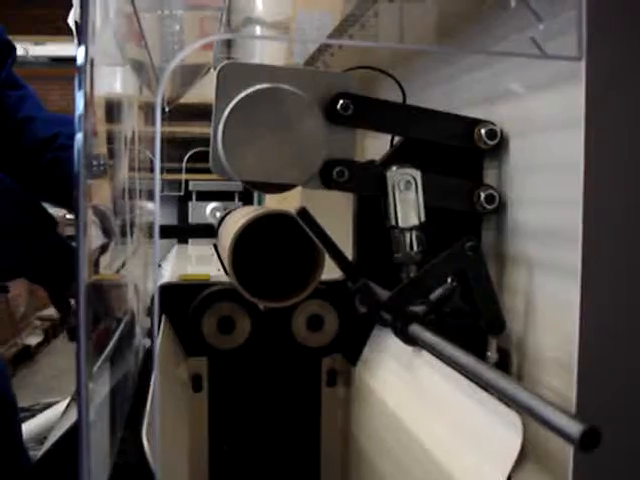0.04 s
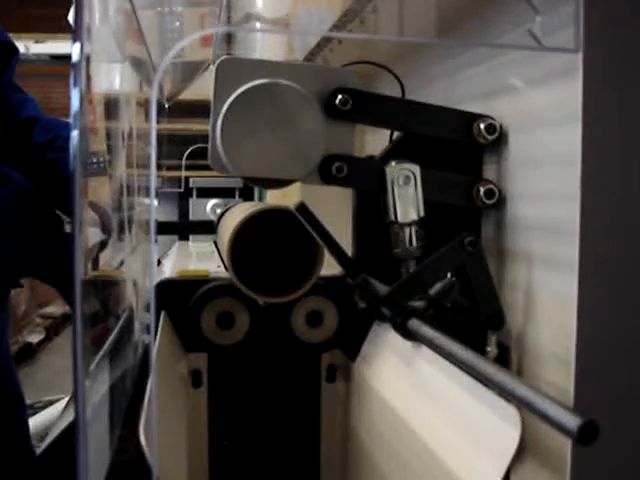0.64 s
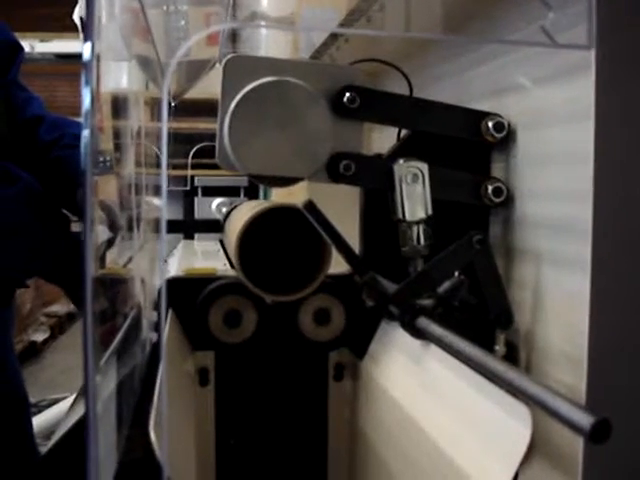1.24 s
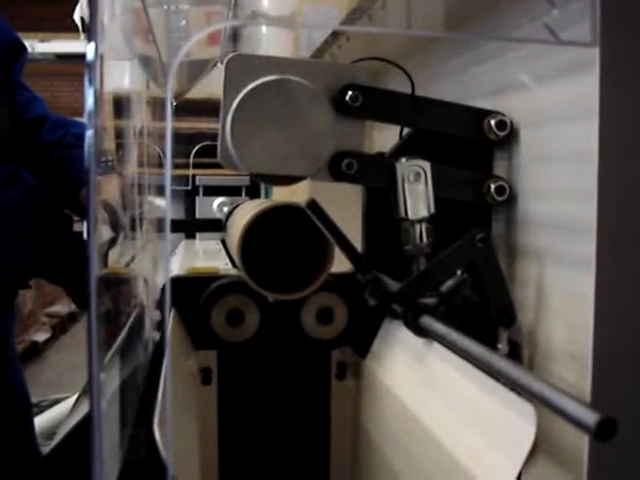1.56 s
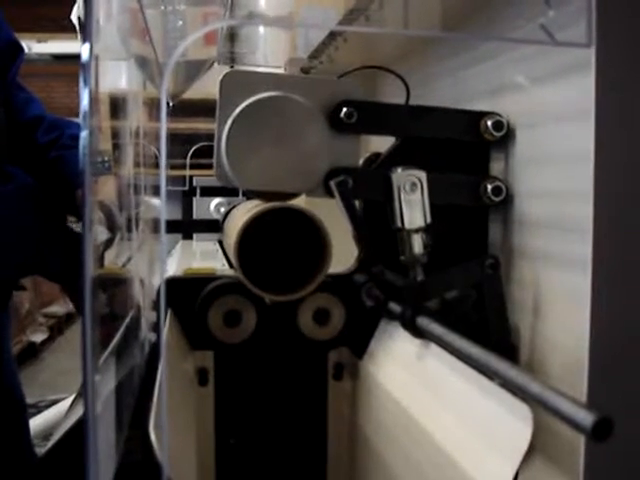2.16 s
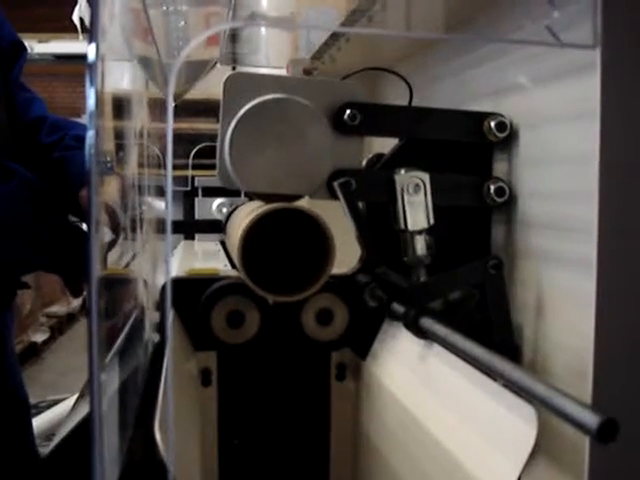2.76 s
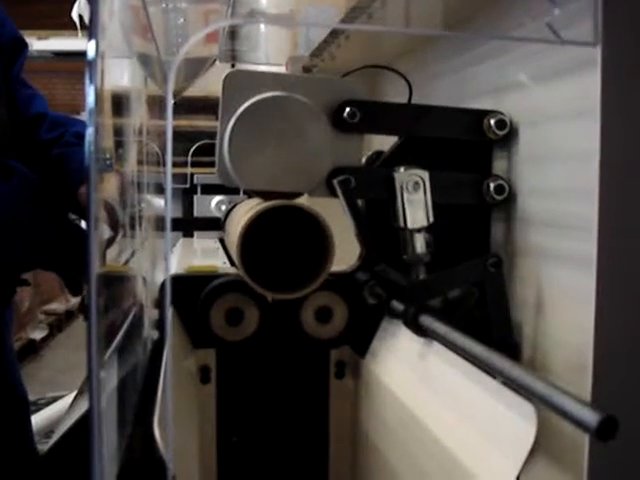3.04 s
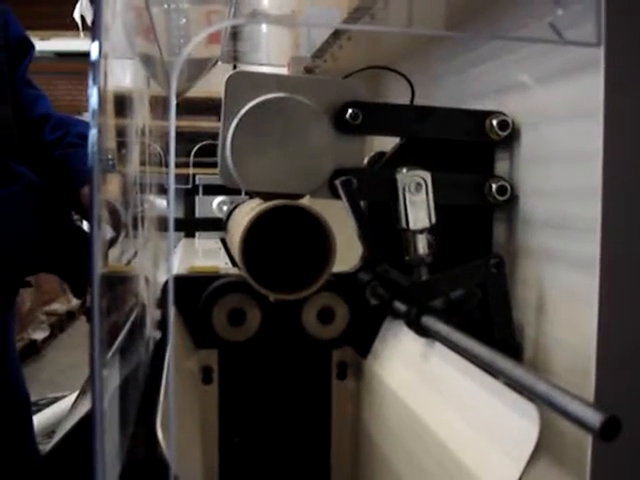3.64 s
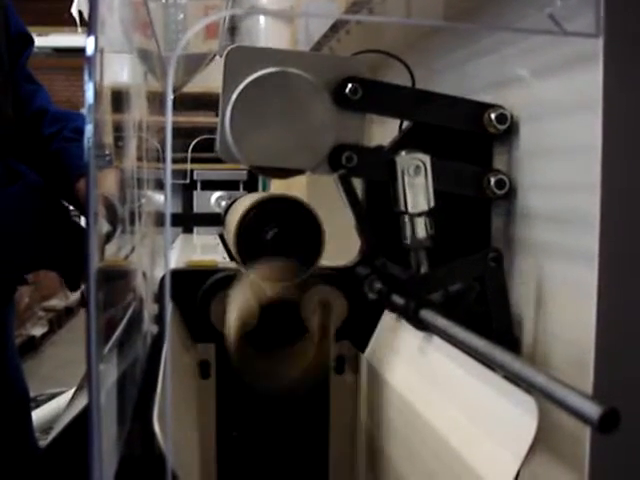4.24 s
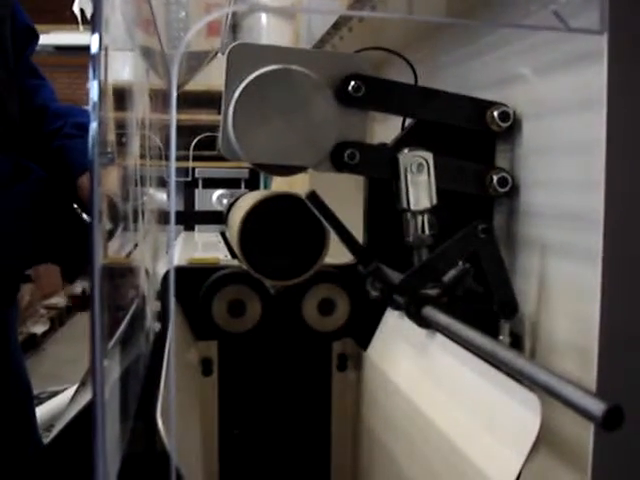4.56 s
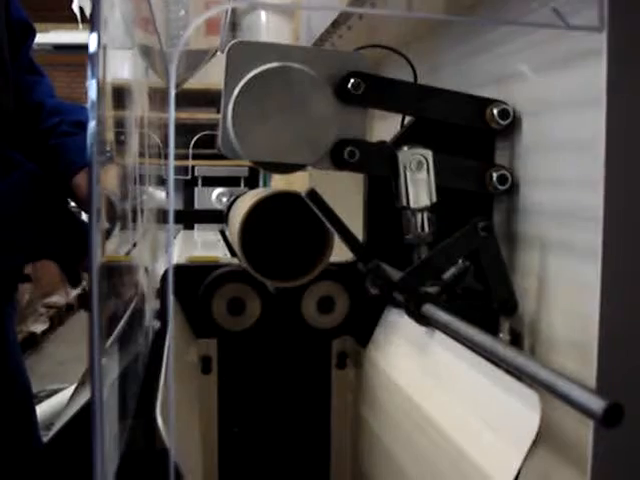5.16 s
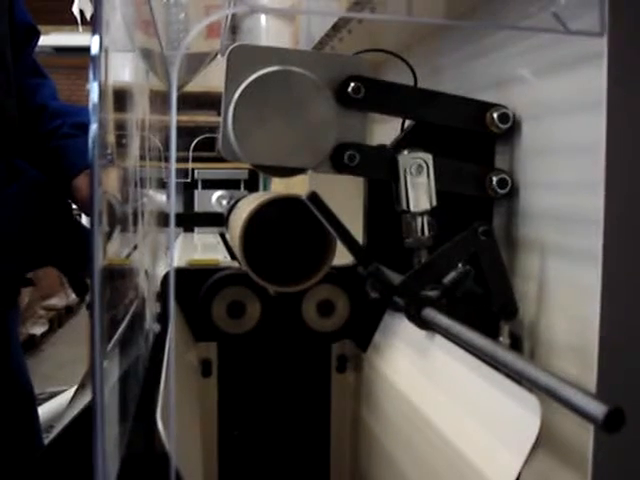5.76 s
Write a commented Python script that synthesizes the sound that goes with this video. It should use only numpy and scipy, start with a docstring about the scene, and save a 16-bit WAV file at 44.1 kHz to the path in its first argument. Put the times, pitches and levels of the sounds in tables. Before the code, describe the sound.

Close by, a cutting machine runs with a roller rumble, a throbbing gear hum and a thin motor whine. A spit of air brings a blade onto a spinning cardboard tube, and it rasps with knocks and squeals until the wall tears through. A steel arm clatters back, the cut ring lands with a dry clack, and the machine runs on more quietly.

```python
"""A round blade cuts a spinning cardboard tube, close by: it rasps in a deepening groove, squeals,
sets the wall groaning and tears through. A spit of air brings the blade down. Afterwards the steel
stop arm clatters back, the cut ring lands with a clack and the tube spins up again. Underneath,
geared rollers rumble and hum, and the motor whines while it runs free."""
import sys
import numpy as np
from scipy import signal
from scipy.fft import rfft, irfft, next_fast_len
from scipy.io import wavfile
from scipy.ndimage import uniform_filter1d, map_coordinates

SR = 44100
rng = np.random.default_rng(int(sys.argv[2]) if len(sys.argv) > 2 else 0)


def wav_record(signal):
    """Record a signal, one row per channel, as 16-bit PCM in the file named by sys.argv[1]."""
    frames = np.transpose(np.atleast_2d(signal))
    bounded = np.clip(frames, -1, 1)
    # unit amplitude maps onto the largest positive 16-bit level
    quanta = np.round(bounded * 32767).astype(np.int16)
    wavfile.write(sys.argv[1], SR, quanta)


N = 264600
TIME_S = np.arange(N) / SR
BITE_S, THROUGH_S, OUT_S = 2.04, 3.52, 3.81  # blade enters, breaks through, is out


def amp(db):
    """Decibels to gain."""
    return 10 ** (np.asarray(db) / 20)


def unit(x):
    """Scale to rms 1."""
    return x / np.sqrt(np.mean(x ** 2) + 1e-20)


def curves(rows):
    """One value per sample for each column after the time."""
    times_s, *columns = np.transpose(rows)
    return [np.interp(TIME_S, times_s, column) for column in columns]


def noise():
    """White noise."""
    return rng.standard_normal(N)


def wobble(rate_hz):
    """Smooth random curve with knots at rate_hz."""
    knots = rng.standard_normal(int(N * rate_hz / SR) + 4)
    return map_coordinates(knots, [TIME_S * rate_hz])


def grains(rate_hz, smooth):
    """Tiny random snaps over a share of smooth friction."""
    return unit((rng.random(N) < rate_hz / SR) * noise()) + smooth * noise()


def narrow(pitch_hz, width_hz):
    """Narrow noise band following a pitch curve, rms 1."""
    phase = 2 * np.pi * np.cumsum(pitch_hz) / SR
    return unit(wobble(width_hz) * np.cos(phase) + wobble(width_hz) * np.sin(phase))


def filtered(x, response):
    """Apply a complex frequency response."""
    size = next_fast_len(N + SR // 2)
    return irfft(rfft(x, size) * response(np.fft.rfftfreq(size, 1 / SR)), size)[:N]


def coloured(x, spectrum):
    """Shape x by (freq_hz, level_db) points, rms 1."""
    freq_hz, level_db = np.transpose(spectrum)
    return unit(filtered(x, lambda hz: amp(np.interp(np.log(hz + 1), np.log(freq_hz), level_db))))


def resonant(x, bands):
    """Pass x through steep (centre_hz, width_hz, level_db) resonances, rms 1."""
    def band(hz, centre_hz, width_hz, level_db):
        damping = 1.5j * hz * width_hz
        return amp(level_db) * (damping / (centre_hz ** 2 - hz ** 2 + damping)) ** 2
    return unit(filtered(x, lambda hz: sum(band(hz, *row) for row in bands)))


def patchy(x, depth_db):
    """Frequency bands flicker independently at random; overall level holds."""
    spectra = signal.stft(x, nperseg=256)[2]
    field = uniform_filter1d(rng.standard_normal(spectra.shape), size=5, axis=0)
    field = unit(uniform_filter1d(field, size=9, axis=1))
    return x.std() * unit(signal.istft(spectra * amp(depth_db * field), nperseg=256)[1][:N])


def burst(start_s, attack_s, t60_s):
    """Impact envelope: fast rise, exponential decay."""
    age_s = np.maximum(TIME_S - start_s, 0)
    return (1 - np.exp(-age_s / attack_s)) * amp(-60 * np.minimum(age_s / t60_s, 3))


def held(start_s, end_s, attack_s, t60_s, swell_db=0):
    """Stroke envelope: rises, swells by swell_db to gain 1 at end_s, decays."""
    rise = np.clip((TIME_S - start_s) / attack_s, 0, 1)
    to_go = np.clip((end_s - TIME_S) / (end_s - start_s), 0, 1)
    decay_db = 60 * np.clip((TIME_S - end_s) / t60_s, 0, 2)
    return rise * amp(-swell_db * to_go - decay_db)


def strokes(rows, **shape):
    """Sum of held envelopes, one per (start_s, end_s, level_db) row."""
    return sum(amp(level_db) * held(start_s, end_s, **shape) for start_s, end_s, level_db in rows)


def load(lag_s):
    """1 with the blade in the tube, else 0; ramps over lag_s."""
    return np.clip(np.minimum(TIME_S - BITE_S, OUT_S + lag_s / 2 - TIME_S) / lag_s, 0, 1)


def turns(speed_hz, drift):
    """Revolutions of a shaft that slows under the blade and drifts."""
    sag = 0.018 * load(lag_s=0.4)
    return np.cumsum(speed_hz * (1 - sag + drift * wobble(3))) / SR


def rolling(fresh):
    """Contact noise: the same bumps every roller turn, plus fresh noise."""
    roller_hz, size = 10.96, 2048
    order = np.arange(size // 2 + 1)
    # two rollers half a turn apart favour even orders
    bumps = irfft(amp(-4 * (order % 2)) * np.exp(2j * np.pi * rng.random(len(order))))
    position = turns(roller_hz, drift=0.001243) % 1 * size
    return unit(map_coordinates(bumps, [position], mode="grid-wrap")) + fresh * noise()


# loudness of rumble, hum and hiss; dips after the clacks, slowly recovers: time_s, rumble_db, mesh_db
MACHINE_LEVEL = [(0.08, -28.5, -27), (0.75, -26.5, -27.5), (1.5, -29.5, -27), (2.5, -29, -31),
                 (3.3, -29.5, -32), (3.9, -34, -39), (4.42, -37.5, -31.5), (4.55, -40, -40),
                 (4.85, -39.5, -41), (5.45, -35, -35.5), (5.9, -32.5, -37.5)]
# frame rumble: freq_hz, level_db
FRAME_SPECTRUM = [(25, -35), (45, -39), (85, -11), (115, -11), (160, -9), (240, -5), (275, -11), (350, -4),
                  (520, -8), (680, -7), (850, -9), (1020, -12), (1150, -7), (1300, -15.5), (1850, -23.5),
                  (2400, -25.5), (4000, -73)]
# housing resonances: centre_hz, width_hz, level_db
HOUSING_BANDS = [(367, 113, -8), (611.4, 27.3, 3), (770, 49, -0.3), (1175, 66, -8.5), (1661, 93, -12.5),
                 (1855, 27, -8.5), (2793, 70, -18)]
def rollers():
    """Rollers shake the frame and ring the housing, a little more under the blade."""
    rumble_db, mesh_db = curves(MACHINE_LEVEL)
    frame = amp(rumble_db + 2.5) * coloured(rolling(fresh=1.7), FRAME_SPECTRUM)
    housing_db = mesh_db - 1.16 + 1.6 * load(lag_s=0.26)
    return frame + amp(housing_db) * resonant(rolling(fresh=1.46), HOUSING_BANDS)


# motor running free: start_s, end_s, level_db
FREE_RUNS = [(0, 1.99, 6.5), (3.83, 4.41, 1.5), (4.8, 6.0, -5.5)]
# motor whine: pitch_hz, level_db
WHINE_LINES = [(7641, -62), (7779, -55.5), (7957, -58), (8046, -60.5), (8134, -57), (8226, -59),
               (8360, -64)]
# faint steady motor tones: pitch_hz, level_db
STEADY_LINES = [(1696, -58.5), (1857, -56), (2417, -65), (2665, -61.5), (3850, -68), (6336, -67)]
# bearing hiss: freq_hz, level_db
BEARING_SPECTRUM = [(900, -11.5), (1500, 2), (1870, -1), (2100, -8.5), (2750, -6), (3300, -7.5),
                    (4500, -8.5), (5900, -11.5), (6300, -13), (6700, -13), (8000, -9.5), (8900, -14),
                    (10000, -18.5)]
def motor():
    """Bearing hiss follows the rumble level; unloaded, the motor sings thin lines over narrow fizz."""
    def lines(rows, flutter_db, flutter_hz, jitter_rad, jitter_hz):
        return np.sqrt(2) * sum(amp(db + flutter_db * wobble(flutter_hz))
                                * np.sin(2 * np.pi * hz * TIME_S + jitter_rad * wobble(jitter_hz))
                                for hz, db in rows)
    free = amp(-17.5) + amp(-1) * strokes(FREE_RUNS, attack_s=0.093, t60_s=0.11)
    whine = lines(WHINE_LINES, flutter_db=2.6, flutter_hz=8.2, jitter_rad=1.1, jitter_hz=2.7)
    fizz = amp(-53.5) * resonant(noise(), [(8220, 84, 0)])
    tones = lines(STEADY_LINES, flutter_db=2.3, flutter_hz=7.4, jitter_rad=1.3, jitter_hz=16)
    rumble_db, _ = curves(MACHINE_LEVEL)
    hiss_db = -37.5 + 0.63 * (rumble_db - rumble_db.mean()) - 7 * load(lag_s=0.0079)
    hiss = amp(hiss_db) * coloured(grains(rate_hz=4000, smooth=0.88), BEARING_SPECTRUM)
    return free * (whine + fizz) + tones + hiss


# weak shaft overtones: multiple, level_db
SHAFT_ORDERS = [(52, -14), (65, -15.5)]
def gears():
    """An off-centre gear's hum throbs and swings in pitch once a turn; the rollers load it unevenly."""
    _, mesh_db = curves(MACHINE_LEVEL)
    shaft_hz, teeth, bump_hz = 14.755, 40, 21.92
    shaft_rad = 2 * np.pi * turns(shaft_hz, drift=0.0009)
    mesh_rad = teeth * shaft_rad + 0.61 * np.sin(shaft_rad) + 0.22 * wobble(40)
    throb_db = 4.2 * np.cos(shaft_rad - 2) + 3 * np.sin(2 * np.pi * turns(bump_hz, drift=0.0016))
    hum = unit(amp(throb_db + 2.6 * wobble(25)) * np.sin(mesh_rad))
    octave_db = 3.1 * wobble(25) + 1.1 * wobble(5.5) - 4.1 * np.sin(shaft_rad + 0.45)
    octave = unit(amp(octave_db) * np.sin(2 * mesh_rad + 0.4 * wobble(50)))
    overtones = sum(amp(db + 5.9 * wobble(13)) * np.sin(k * shaft_rad) for k, db in SHAFT_ORDERS)
    return amp(mesh_db - 0.67) * (hum + overtones + amp(-4.5) * octave)


# tube sliding on the rollers: start_s, end_s, level_db
TUBE_SLIDES = [(0, 1.96, -32.5), (5.52, 6.0, -36)]
# cardboard hiss: freq_hz, level_db
CARDBOARD_SPECTRUM = [(900, -24), (1400, -11.5), (1750, 0.5), (2050, -12), (2800, -6), (3200, -10),
                      (4250, -9.5), (4650, -6), (5600, -10.5), (6700, -10.5), (7900, -8.5), (8900, -12),
                      (10000, -15.5)]
# judder building until the tube slips: start_s, slip_s, peak_db
TUBE_JUDDERS = [(2.298, 2.56, -24), (2.616, 2.954, -27), (3.067, 3.40, -34)]
# roller cradle resonances: centre_hz, width_hz, level_db
CRADLE_BANDS = [(194, 24, -3.5), (239.4, 35, 0), (375, 24, 2.5), (462, 67, -7), (663, 94, -2.5)]
def tube():
    """Spinning cardboard hisses on the rollers and judders under the blade."""
    slide = strokes(TUBE_SLIDES, attack_s=0.026, t60_s=0.1) + amp(-38) * load(lag_s=0.33)
    hiss = patchy(coloured(grains(rate_hz=4000, smooth=0.9), CARDBOARD_SPECTRUM), depth_db=2)
    shake = strokes(TUBE_JUDDERS, attack_s=0.031, t60_s=0.1, swell_db=5)
    judder = resonant(grains(rate_hz=340, smooth=0.35), CRADLE_BANDS)
    return slide * amp(0.93 * wobble(30)) * hiss + shake * judder


# valve flow: start_s, end_s, peak_db
AIR_SPIT = (1.963, 2.033, -27)
# puffs in the flow: start_s, end_s, level_db
AIR_PUFFS = [(1.968, 1.989, -32.5), (1.995, 2.002, -26.5), (2.012, 2.015, -27), (2.022, 2.027, -21.5)]
# escaping air: freq_hz, level_db
AIR_SPECTRUM = [(500, -17), (1500, 1.5), (2500, 2), (3400, -1), (4800, 3.5), (5600, -2), (7000, -0.5),
                (8300, -1.5), (10000, -6.5)]
def valve():
    """Compressed air sputters ever harder until the blade is down."""
    flow = strokes([AIR_SPIT], attack_s=0.004, t60_s=0.043, swell_db=8)
    puffs = strokes(AIR_PUFFS, attack_s=0.0017, t60_s=0.018)
    return (flow + puffs) * amp(1.5 * wobble(150)) * patchy(coloured(noise(), AIR_SPECTRUM), depth_db=4)


# cut ring contacts: start_s, level_db
RING_HITS = [(4.7311, -9), (4.735, -19.5), (4.7442, -21), (4.751, -26)]
# cut ring modes: pitch_hz, level_db, t60_s
RING_MODES = [(440, -7, 0.028), (880, -3.5, 0.028), (1060, -4, 0.02), (1530, -2.5, 0.021),
              (1750, -0.5, 0.024), (2675, 2.5, 0.026), (2980, -6, 0.024), (3300, -8, 0.022),
              (3670, -15, 0.025), (4770, -20, .022)]
def ring_landing():
    """The cut ring lands with a dry crack and chatters; the guard answers briefly."""
    clack = np.zeros(N)
    for start_s, hit_db in RING_HITS:
        draws = rng.uniform((0.85, -0.7), (1.15, 0.7), (len(RING_MODES), 2))
        for (gain, offset_rad), (pitch_hz, level_db, t60_s) in zip(draws, RING_MODES):
            phase = 2 * np.pi * pitch_hz * (TIME_S - start_s) + offset_rad + 0.25 * wobble(300)
            mode = burst(start_s, attack_s=0.00022, t60_s=t60_s) * np.sin(phase)
            clack += gain * amp(hit_db + level_db - 5) * mode
        crunch = coloured(noise(), [(300, -7), (1200, 0), (3600, 1), (4400, -17), (10000, -30)])
        clack += amp(hit_db - 8) * burst(start_s, attack_s=0.0002, t60_s=0.016) * crunch
    first_s, first_db = RING_HITS[0]
    crack = coloured(noise(), [(1200, -4.5), (4500, -1), (6500, -0.5), (10000, -9.5)])
    crack *= amp(first_db - 6) * burst(first_s, attack_s=0.0001, t60_s=0.0056)
    guard = resonant(noise(), [(1720, 390, -1), (3170, 430, 2)])
    guard *= amp(-29.5) * burst(first_s, attack_s=0.004, t60_s=0.18)
    return clack + crack + guard


# arm and blade contacts: start_s, ring_db, scrape_db, boom_db, thud_db
CONTACTS = [(1.987, -33, -40, -7, -44), (2.032, -15, -26, -30, -46), (2.099, -30, -42, -13, -58),
            (2.183, -30, -20, -26, -39), (2.226, -31, -19, -34, -54), (2.262, -27, -32.5, -15, -46),
            (2.318, -11, -23.5, -30, -60), (2.574, -36, -16, -22, -42), (2.944, -13.5, -41, -20, -42),
            (3.487, -30, -31, -28, -46), (3.941, -39, -28, -43, -59), (3.972, -23, -44, -29, -64),
            (4.417, -20.5, -28.5, -19, -58), (4.4245, -21, -18, -12, -44), (4.433, -28, -26.5, -32, -52),
            (4.444, -28, -21, -24, -49), (4.448, -22, -15.5, -28, -49), (4.452, -13.5, -23.5, -25, -51),
            (4.458, -23.5, -23.5, -31, -58), (4.484, -32, -27.5, -30, -60), (4.498, -24, -39, -32, -55),
            (4.522, -32, -25.5, -34, -54)]
# tube wall resonances, also for groans: centre_hz, width_hz, level_db
WALL_BANDS = [(620, 380, -3), (748, 48, 8.5), (940, 41, 2)]
# steel scrape: freq_hz, level_db
SCRAPE_SPECTRUM = [(400, -14), (1200, -3), (2800, -3), (3400, 0.5), (4800, 3), (6000, -1.5), (8000, 2.5),
                   (10000, -7)]
# steel arm resonances: centre_hz, width_hz, level_db
ARM_BANDS = [(1490, 70, 1), (2250, 110, 6), (2750, 200, 3.5), (4780, 340, 3.5), (5650, 700, -3)]
# low panel modes: pitch_hz, level_db, t60_s
PANEL_MODES = [(239, -5.5, 0.052), (347, -1.5, .04), (450, -0.5, 0.042)]
def knocks():
    """Each contact rings the tube, scrapes and rings the arm, booms the panels and pushes the frame."""
    times_s, ring_db, scrape_db, boom_db, thud_db = np.transpose(CONTACTS)
    def strikes(levels_db, attack_s, t60_s):
        return sum(amp(db) * burst(s, attack_s, t60_s) for s, db in zip(times_s, levels_db))
    hollow = resonant(noise(), [(420, 180, -2.5), (670, 153, 4.5), (980, 183, 2.5)])
    hollow *= strikes(ring_db, attack_s=0.0017, t60_s=0.043)
    wall = amp(-21) * strikes(ring_db, attack_s=0.017, t60_s=0.68) * resonant(noise(), WALL_BANDS)
    scrape = amp(-0.5) * coloured(noise(), SCRAPE_SPECTRUM) + amp(-3.5) * resonant(noise(), ARM_BANDS)
    scrape *= strikes(scrape_db, attack_s=0.0008, t60_s=0.028)
    arm = amp(-29) * strikes(scrape_db, attack_s=0.008, t60_s=0.25) * resonant(noise(), ARM_BANDS)
    panel = sum(amp(db) * burst(0, attack_s=0.0032, t60_s=t60_s) * np.sin(2 * np.pi * hz * TIME_S)
                for hz, db, t60_s in PANEL_MODES)
    impulses = np.bincount(np.round(times_s * SR).astype(int), amp(boom_db), N)
    highpass = signal.butter(2, 170, "high", fs=SR, output="sos")
    boom = signal.sosfilt(highpass, signal.fftconvolve(impulses, panel)[:N])
    thud = amp(13) * strikes(thud_db, attack_s=0.003, t60_s=0.053)
    return hollow + wall + scrape + arm + boom + thud


# wall under strain: start_s, end_s, level_db
WALL_STRAINS = [(2.012, 2.058, -21), (2.06, 2.179, -18), (3.546, 3.667, -27), (3.711, 3.793, -25)]
def groans():
    """The tube wall groans as the blade enters and leaves."""
    strain = strokes(WALL_STRAINS, attack_s=0.011, t60_s=0.086, swell_db=1)
    return strain * resonant(grains(rate_hz=2000, smooth=1), WALL_BANDS)


# blade squeals: start_s, end_s, first_hz, last_hz, level_db
SQUEAL_GLIDES = [(1.966, 2.032, 3550, 2250, -32.5), (3.62, 3.76, 4120, 3620, -35.5),
                 (3.58, 3.79, 2300, 1950, -37.5), (3.56, 3.68, 1750, 1450, -39)]
def squeals():
    """The blade sticks and slips on cardboard: rough, wavering tones glide down."""
    sound = np.zeros(N)
    for start_s, end_s, first_hz, last_hz, level_db in SQUEAL_GLIDES:
        pitch_hz, = curves([(start_s, first_hz), (end_s, last_hz)])
        tone = narrow(pitch_hz + 80 * wobble(60), width_hz=360)
        sound += amp(level_db) * held(start_s, end_s, attack_s=0.005, t60_s=0.12) * tone
    return sound


# wall giving way: start_s, end_s, level_db
WALL_RIPS = [(3.524, 3.651, -26), (3.689, 3.788, -27)]
# snapping fibres: freq_hz, level_db
FIBRE_SPECTRUM = [(350, -26), (650, -2), (950, 10.5), (1300, -2), (1700, 6), (2000, 1), (2200, 2),
                  (2500, -3.5), (2830, 3.5), (3300, -9), (3800, -2.5), (4600, -0.5), (5100, -12),
                  (6500, -7.5), (7700, 4), (8600, -5), (10000, -21.5)]
# blade resonances in a rip: centre_hz, width_hz, level_db
RIP_BANDS = [(2190, 70, -1.5), (2844, 60, 3), (4000, 110, -5.5)]
# last strip cracking: start_s, level_db
STRIP_CRACK = (3.586, -13)
# crack resonances: centre_hz, width_hz, level_db
STRIP_BANDS = [(960, 280, 0), (1680, 400, -1), (2170, 220, 0)]
def tearing():
    """Rips start hard, ease off and make the blade sing; the last strip of wall cracks."""
    rips = strokes(WALL_RIPS, attack_s=0.011, t60_s=0.16, swell_db=-2.5)
    flutter = amp(1.5 * wobble(200))
    fibres = patchy(coloured(grains(rate_hz=5000, smooth=0.39), FIBRE_SPECTRUM), depth_db=1.5)
    ring = amp(-7) * resonant(noise(), RIP_BANDS)
    crack_s, crack_db = STRIP_CRACK
    crack = amp(crack_db) * burst(crack_s, attack_s=0.0013, t60_s=0.038) * resonant(noise(), STRIP_BANDS)
    return rips * (flutter * fibres + ring) + crack


# groove friction: freq_hz, level_db
GROOVE_SPECTRUM = [(1200, -27), (2100, -13), (2450, -8), (3000, -4), (4250, -3), (4650, -1.5), (5400, -2.5),
                   (6400, -6.5), (7400, -2), (8100, -4.5), (8800, -11), (9500, -4), (10000, -9)]
# blade resonances: centre_hz, width_hz, level_db
BLADE_BANDS = [(1446, 66, 2.5), (2160, 70, -4.5), (2818, 103, -3)]
# sizzle of the pinched edge: centre_hz, width_hz, level_db
EDGE_BANDS = [(7450, 430, 0)]
# high blade note, sinking with depth: first_hz, last_hz, peak_db, growth_db
BLADE_NOTE = (4740, 4620, -34, 8)
def blade_rasp():
    """The edge rubs, rings and sizzles in its deepening groove, pressing harder once a turn."""
    cut_s = BITE_S, THROUGH_S
    deepening = amp(-27.5) * held(*cut_s, attack_s=0.098, t60_s=0.1, swell_db=7)
    through = amp(-29) * held(THROUGH_S, OUT_S, attack_s=0.034, t60_s=0.074)
    rub = (deepening + through) * coloured(grains(rate_hz=2800, smooth=0.77), GROOVE_SPECTRUM)
    ring = resonant(grains(rate_hz=2500, smooth=1), BLADE_BANDS)
    ring *= amp(-35) * held(*cut_s, attack_s=0.32, t60_s=0.38)
    sizzle = amp(-33.5 + 2.9 * wobble(90)) * resonant(noise(), EDGE_BANDS)
    sizzle *= held(*cut_s, attack_s=0.1, t60_s=0.7, swell_db=19.5)
    first_hz, last_hz, peak_db, growth_db = BLADE_NOTE
    pitch_hz, = curves([(BITE_S, first_hz), (THROUGH_S, last_hz)])
    note = narrow(pitch_hz + 60 * wobble(25), width_hz=480)
    note *= amp(peak_db) * held(*cut_s, attack_s=0.23, t60_s=0.6, swell_db=growth_db)
    turn_hz, crest_s = 10.6, 2.45
    press_db = 1.7 * np.cos(2 * np.pi * turn_hz * (TIME_S - crest_s))
    flutter_db = 1.1 * wobble(76) + 0.3 * wobble(16)
    return amp(press_db + flutter_db) * (patchy(rub + sizzle, depth_db=1.9) + ring + note)


def scene():
    """The whole machine, mono."""
    machine = rollers() + gears() + motor() + tube() + valve()
    cut = blade_rasp() + tearing() + groans() + squeals()
    return (machine + cut + knocks() + ring_landing())[None]


def record(dry):
    """Brief silence, fast fade-in, brick-wall low-pass."""
    start_s, fade_s, cutoff_hz = 0.042, 0.003, 10080
    fade_in = np.clip((TIME_S - start_s) / fade_s, 0, 1)
    return filtered(dry[0] * fade_in, lambda hz: hz < cutoff_hz)[None]


dry = scene()
out = record(dry)
wav_record(out)
```